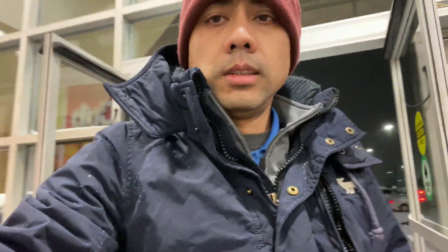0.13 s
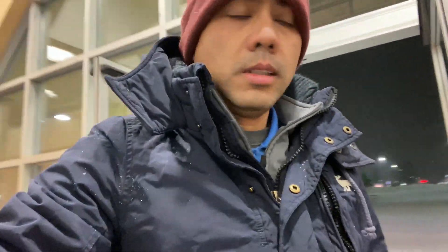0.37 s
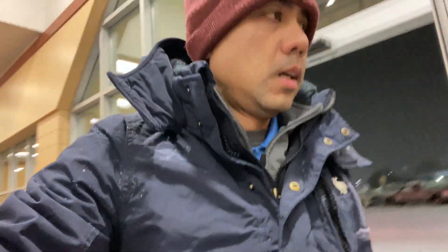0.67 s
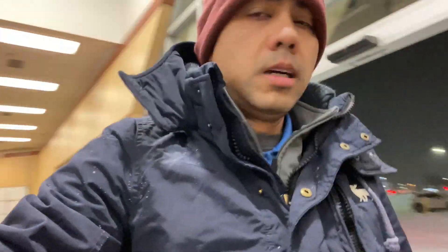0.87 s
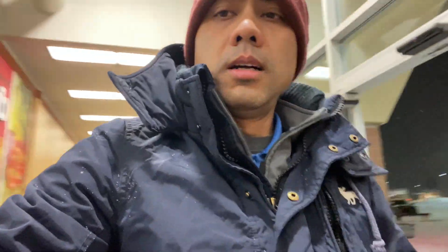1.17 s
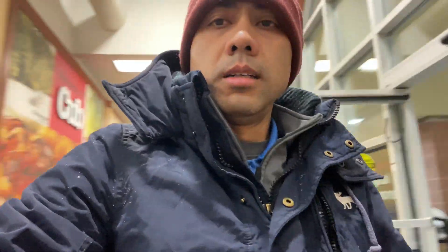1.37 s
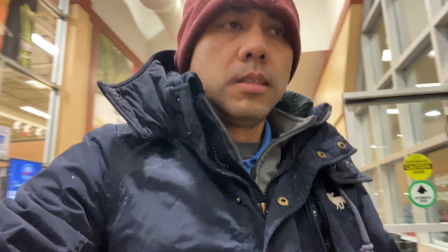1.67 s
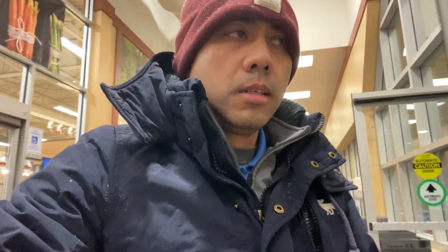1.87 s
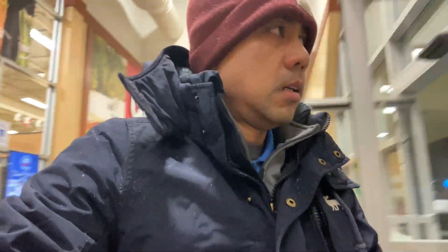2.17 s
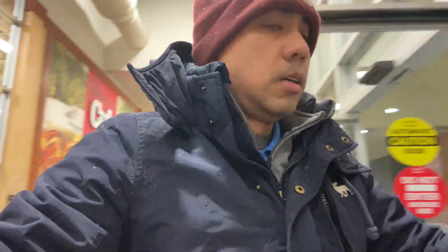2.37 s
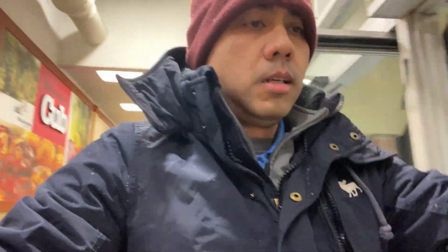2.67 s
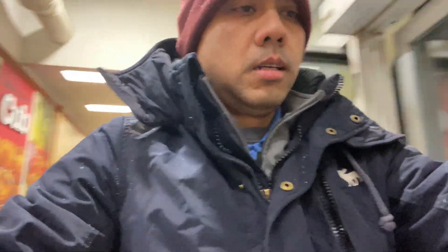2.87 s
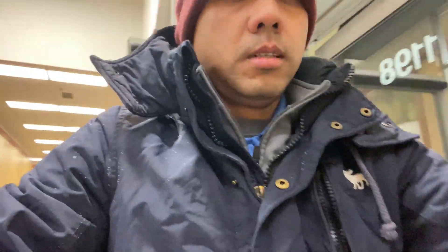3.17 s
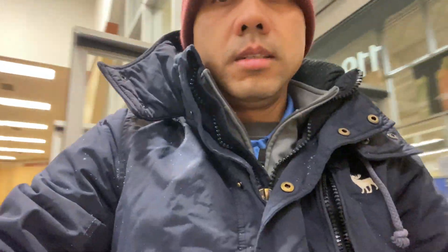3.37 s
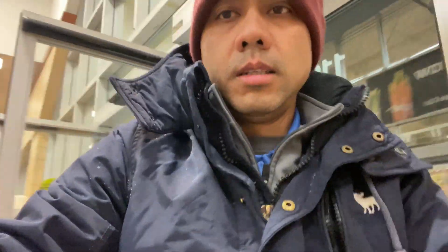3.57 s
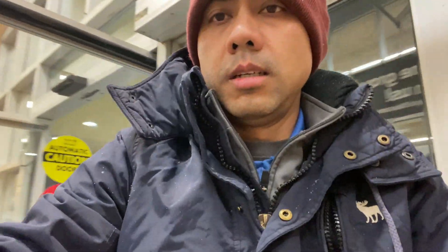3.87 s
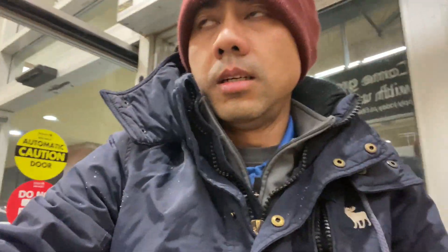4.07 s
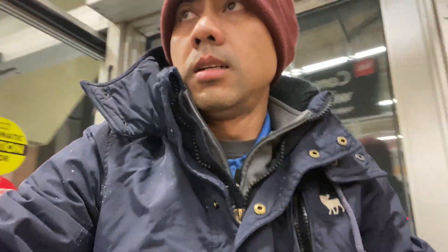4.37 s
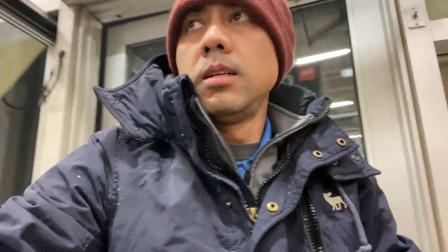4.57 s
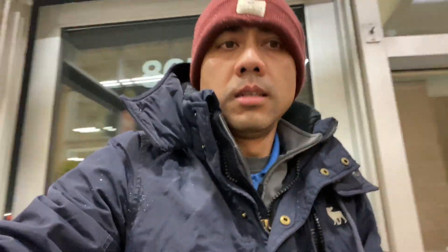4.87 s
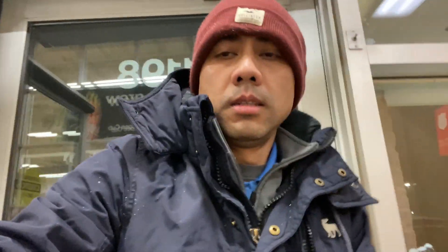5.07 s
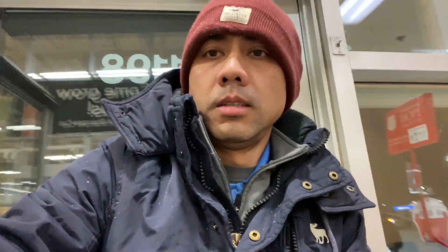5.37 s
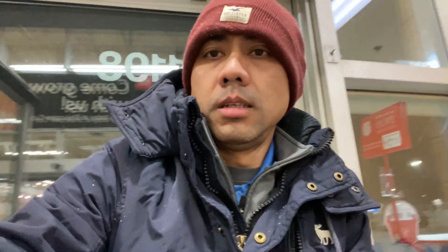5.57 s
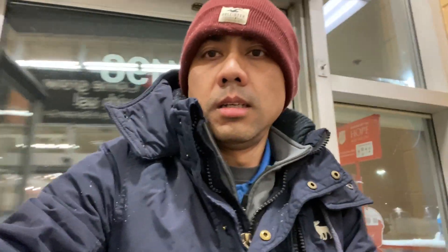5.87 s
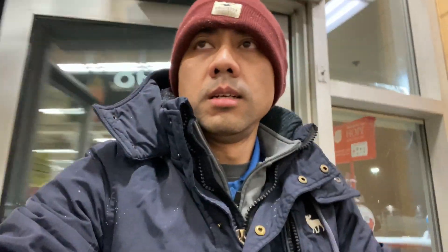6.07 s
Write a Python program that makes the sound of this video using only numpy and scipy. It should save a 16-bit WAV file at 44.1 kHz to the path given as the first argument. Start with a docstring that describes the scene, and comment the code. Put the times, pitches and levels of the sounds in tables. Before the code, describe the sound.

A metal shopping cart rumbles through a store entrance, with one sharp early clack, then thudding door sills and close nylon jacket swishes.

```python
"""Shopping cart through a store entrance

A metal cart is pushed through glass doors, heard from the cart itself.
Grit impacts drive the rumble, the roar and the modes of frame and basket; sills give thuds and knocks.
Loose metal clacks and rattles as bursts of contacts on ringing modes; low hums drone, casters scuff.
A nylon jacket swishes close by as shaped grain noise; a narrow whine comes in runs.
Air hisses, and faint hiss pulses recur steadily, as from an ultrasonic door sensor.
"""
import sys
import numpy as np
from scipy import signal
from scipy.fft import rfft, irfft, next_fast_len
from scipy.io import wavfile

SR = 44100
rng = np.random.default_rng(int(sys.argv[2]) if len(sys.argv) > 2 else 0)


def digitize_waveform(pressure):
    """Quantize a signal to 16-bit integers and store it at the path in sys.argv[1].

    Rows of a 2-D input are taken as channels; values are limited to [-1, 1].
    """
    field = np.atleast_2d(pressure).T
    bounded = np.clip(field, -1, 1)
    quanta = np.round(bounded * 32767).astype(np.int16)
    wavfile.write(sys.argv[1], SR, quanta)


N = 274302
TIME = np.arange(N) / SR

# rolling, by speed and floor: t/s, rumble level before trim/dB, roar level before trim/dB
ROLLING = [(0, -26.5, -33.5), (.7, -25.5, -32.5), (1.27, -29, -30.5), (1.45, -24.5, -32.5), (2.4, -26, -34),
           (3.1, -24, -35), (4.05, -24, -33), (5.3, -23.5, -33.5), (5.7, -23.5, -29.5), (6.22, -25, -33)]
# frame rumble spectrum: f/Hz, relative density/dB per Hz
RUMBLE_SPECTRUM = [(20, -31), (35, -20), (50, -6), (80, -4), (110, -6.5), (150, 2), (200, -2.5),
                   (250, -2.5), (320, -9), (450, -21.5), (900, -50.5)]
# wheel roar spectrum: f/Hz, relative density/dB per Hz
ROAR_SPECTRUM = [(150, -15), (300, -15.5), (420, -1), (530, 3), (700, -2.5), (850, -3.5), (1100, -10.5),
                 (1600, -34), (3000, -33.5), (8000, -43.5)]
# tube frame modes: f/Hz, relative level/dB, t60/s
FRAME_MODES = [(288.6, -0.5, 0.22), (405, -6, 0.3), (487, -8.5, 0.49)]
# wire basket modes, also rung by clacks: f/Hz, relative level/dB, t60/s
BASKET_MODES = [(411, 3.5, 0.081), (558.5, 4, 0.25), (864, -6, 0.16), (1017, -0.5, 0.082), (1220, -3, 0.15),
                (1303, -7, 0.28), (1440, -8.5, 0.15), (1880, -13, 0.22), (2100, -7, .23), (2660, -13, 0.14),
                (2820, -10, 0.17), (3120, -26.5, 0.22), (3570, -28, 0.16), (3950, -7, 0.13),
                (6530, -5, .08)]
# ribbed sills and mats: start/s, length/s, extra rumble before trim/dB, frame judder level/dB
RIBBED_SILLS = [(3.194, 0.45, -29, -32), (4.375, 0.22, -26, -24), (4.62, 0.24, -48, -24.5),
                (4.883, 0.28, -31, -27)]
SILL_RISE_S, SILL_FALL_S = 0.065, 0.065
SHUDDER_RE_BUMP_DB, SHUDDER_FADE_S = -15.5, 0.026
USUAL_ROAR_DB = -33.5
HUM_AT_USUAL_ROAR_DB, HUM_DB_PER_ROAR_DB = -40, 0.62


def wheels(rumble_trim_db=-1, roar_trim_db=2.5, judder_shared=0.18, shudder_rise_s=0.0043):
    """Grit shakes the frame, roars in the hubs and hums the basket; sills judder, bumps shudder."""
    ribs = [(stretch(s, length_s, SILL_RISE_S, SILL_FALL_S), low_db, judder_db)
            for s, length_s, low_db, judder_db in RIBBED_SILLS]
    shudder = together(amp(db + SHUDDER_RE_BUMP_DB) * fading(s, shudder_rise_s, SHUDDER_FADE_S)
                       for s, db, *_ in WHEEL_BUMPS)
    sill_shaking = [on * amp(low_db) for on, low_db, _ in ribs]
    shaking = together([level(ROLLING, axis=1), shudder] + sill_shaking)

    tremor = grains(per_s=2500, spread_db=1) * waver(rate_hz=14, depth_db=.6)
    rumble = unit(colour(tremor, RUMBLE_SPECTRUM, LIKENESS)) * shaking

    grit = grains(per_s=5000, spread_db=1.2) * waver(rate_hz=14, depth_db=.8)
    roar = unit(colour(grit, ROAR_SPECTRUM, LIKENESS)) * level(ROLLING, axis=2)

    frame = shaken(FRAME_MODES)
    frame = unit(frame + judder_shared * frame[::-1])
    judder = frame * together(on * amp(judder_db) for on, _, judder_db in ribs)

    hum = shaken(BASKET_MODES) * amp(HUM_AT_USUAL_ROAR_DB) * pace() ** HUM_DB_PER_ROAR_DB
    return amp(rumble_trim_db) * rumble + amp(roar_trim_db) * roar + judder + hum


def pace():
    """Roar gain relative to the usual roar."""
    return level(ROLLING, axis=2) / amp(USUAL_ROAR_DB)


# wheels on sills and mats: t/s, level before trim/dB, thud f/Hz, knock re thud before trim/dB, left-right/dB
WHEEL_BUMPS = [(3.184, -6, 273, -8.5, -6), (3.195, -19, 275, -2, -4), (3.216, -9, 235, -8, -17),
               (3.2204, 2, 166, -18, -4), (3.281, -2, 139, -11, -1), (3.293, -12.5, 198, -7, -3),
               (3.311, -14, 164, -18, 3), (3.349, -10, 136, -6.5, -2), (3.404, -2.5, 158, -16, -4),
               (3.45, -7, 138, -22, -3), (3.566, -11, 197, -14, 8), (3.611, -18, 236, -0.5, -4),
               (3.632, -19.5, 304, 1, -1), (4.131, -8, 168, -7.5, -4), (4.146, -8.5, 186, -21, 2),
               (4.187, -12.5, 243, 1.5, 3.5), (4.279, -1, 269, -22, -4), (4.357, -3.5, 282, -24, -4),
               (4.476, -11.5, 268, -10, -2), (4.519, -16.5, 149, -3, -5), (4.671, -10, 280, -14, -4),
               (4.714, -23, 274, -12, 3), (4.758, -8.5, 287, -6, -6), (4.859, 1, 274, -12.5, -3.5),
               (4.928, -6, 261, -13, 3), (4.934, -0.5, 156, -15, -4), (4.95, -8, 255, -12, -7),
               (5.268, -13, 172, -10, -4), (5.392, -17, 226, -6, -.5), (5.491, -8.5, 275, -6, -8),
               (5.503, -14, 306, -12, -7), (5.526, -9, 177, -8, 3), (5.623, -10, 282, -5, -4),
               (5.682, -6.5, 171, -12, -2), (5.703, -12, 199, -8.5, -.5)]
# knock spectrum: f/Hz, relative density/dB per Hz
KNOCK_SPECTRUM = [(60, -15), (130, -20), (300, 0.5), (500, -2), (800, -5.5), (1050, -17), (1500, -20),
                  (4000, -48), (16000, -91)]


def bumps(thud_trim_db=-3, knock_trim_db=-2.0, thud_fade_s=0.013, thud_rise_s=0.0068, knock_fade_s=0.01):
    """A wheel drops over an edge: a hard knock and a damped sine thud of the frame."""
    out, t = np.zeros((2, N)), TIME[:SR // 4]
    envelope = np.exp(-t / thud_fade_s) * (1 - np.exp(-t / thud_rise_s))
    for s, db, hz, knock_db, side_db in WHEEL_BUMPS:
        thud = amp(thud_trim_db) * np.sin(2 * np.pi * hz * t) * envelope
        knock = amp(knock_trim_db + knock_db) * burst(KNOCK_SPECTRUM, knock_fade_s)
        add(out, s, amp(db) * pan(side_db) * (thud + knock))
    return out


# hardest wheel strikes on metal sills: t/s, level/dB, first f/Hz
SILL_CLONKS = [(3.183, -16.5, 724), (3.2155, -11.5, 973), (3.61, -22, 792), (4.928, -19.5, 1017),
               (5.49, -21, 800)]


def clonks(fade_s=0.0042, sag_s=0.011):
    """A hollow clonk that sags in pitch as the tread gives."""
    out, t = np.zeros((2, N)), TIME[:SR // 8]
    envelope = 2 * (t / fade_s) ** .5 * np.exp(-t / fade_s)
    for s, db, hz in SILL_CLONKS:
        turns = np.cumsum(hz / (1 + t / sag_s)) / SR
        add(out, s, amp(db) * (envelope * np.sin(2 * np.pi * turns))[None])
    return out


# loose metal blows: t/s, level/dB, fade/s, treble lift/dB, left-right/dB
METAL_CLACKS = [(1.101, -23, 0.013, -2, 7), (1.1112, -4.5, 0.0033, 2, -4.5), (1.1173, -19, 0.0021, 7, -11),
                (1.1233, -21, 0.0067, -4, 6), (1.1357, -9, 0.004, -1, 2.5), (1.1382, -9, 0.0017, 47, -2),
                (1.1406, -13, 0.0068, -4, 3), (1.192, -20, .008, -6, 2), (3.2148, -26, 0.0039, 10, -8),
                (4.186, -18.5, 0.011, -3, -3), (4.565, -24, 0.015, 0, -1), (4.7343, -22, 0.012, -3, -6),
                (4.927, -27, 0.0039, -9, 2), (5.491, -23, 0.0027, -6, 3), (5.4955, -16.5, 0.012, -6, -3)]
# clack spectrum before lift: f/Hz, relative density/dB per Hz
CLACK_SPECTRUM = [(120, -18), (350, -2), (600, 0.5), (900, 4), (1400, 4), (2000, -2), (2900, -0.5),
                  (4200, -7), (6000, -12), (8200, -13.5), (10000, -17.5), (16000, -31)]


def clacks(ring_re_clack_db=15, knee_hz=4000):
    """Loose metal chatters against the basket, and every blow rings its modes."""
    out = np.zeros((2, N))
    for s, db, fade_s, lift_db, side_db in METAL_CLACKS:
        spectrum = [(hz, d + lift_db * hz ** 2 / (hz ** 2 + knee_hz ** 2)) for hz, d in CLACK_SPECTRUM]
        add(out, s, amp(db) * pan(side_db) * burst(spectrum, fade_s))
        add(out, s, amp(db + ring_re_clack_db) * ring(BASKET_MODES))
    return out


# cart body under the heaviest clacks: t/s, level/dB, f/Hz, fade/s
BODY_BOOMS = [(1.11, -15, 420, 0.017), (1.136, -15, 270, 0.005), (1.164, -17, 551, 0.041)]


def booms(rise_s=0.0037):
    """Short low rings of the cart's body under the heavy clacks."""
    out = np.zeros((2, N))
    for s, db, hz, fade_s in BODY_BOOMS:
        out += amp(db) * fading(s, rise_s, fade_s) * np.sin(2 * np.pi * hz * (TIME - s))
    return out


# loose wires: t/s, level/dB, pitch f/Hz, chatter/s, left-right/dB
WIRE_RATTLES = [(1.111, -24, 2600, 0.0061, -8), (1.123, -17, 2620, 0.0033, 13), (1.14, -14, 1450, .003, 0),
                (1.187, -31, 2970, 0.0038, 1), (3.184, -30, 2640, .003, 9), (3.215, -28, 2150, 0.0038, 6),
                (3.29, -30, 2470, 0.0082, 2.5), (3.349, -32, 2000, 0.0046, -2),
                (3.385, -32, 2520, 0.0037, 2.5), (4.565, -26, 1876, 0.012, 2),
                (4.735, -24, 2650, 0.0036, 2), (4.737, -31, 1880, 0.0073, 9),
                (4.749, -29.5, 2890, 0.0047, 0), (4.831, -28, 2970, .003, 2), (4.9267, -27, 2100, .003, 2),
                (4.966, -34, 2500, .003, -1), (5.495, -19, 2010, 0.0054, 0), (5.51, -26, 2060, .005, 2),
                (5.537, -26, 2350, .004, 1), (5.552, -26, 2030, .004, -1), (5.569, -27, 2030, 0.0054, 6)]
# wire modes: multiple of pitch, relative level/dB, t60/s
WIRE_MODES = [(1, 5.5, 0.023), (1.1, -6, .018), (1.3, 1, .016), (1.6, -4, 0.022)]


def rattles():
    """A loose wire chatters against its neighbours and rings briefly at its own pitch."""
    out = np.zeros((2, N))
    for s, db, hz, chatter_s, side_db in WIRE_RATTLES:
        wire = ring([(hz * k, d, t60) for k, d, t60 in WIRE_MODES])[:, :SR // 8]
        x = signal.fftconvolve(contacts(chatter_s), wire, axes=1)
        x *= np.sqrt(chatter_s * SR) / np.linalg.norm(x, axis=1, keepdims=True)
        add(out, s, amp(db) * pan(side_db) * x)
    return out


# low hums of wheels and basket: start/s, length/s, first f/Hz, last f/Hz, level/dB
CART_DRONES = [(0.15, 0.86, 96, 95.1, -37), (0.565, 0.29, 243, 233.4, -30), (1.34, 1.11, 155, 147, -32),
               (.55, 0.87, 558, 559, -49), (1.828, 0.49, 560, 574, -37.5), (2.79, 0.33, 148, 144.8, -35),
               (3.022, 0.2, 220, 255, -27), (3.883, 0.36, 178, 177.5, -31)]
DRONE_FADE_S = 0.073


def drones():
    """Unsteady low hums of wheels and basket, each gliding slightly in pitch."""
    out = np.zeros((2, N))
    for s, length_s, first_hz, last_hz, db in CART_DRONES:
        glide_hz = np.interp(TIME, [s, s + length_s], [first_hz, last_hz])
        drone = tone(glide_hz, drift=0.01337, flutter_db=2.0, port_turns=0.023)
        out += drone * amp(db) * stretch(s, length_s, DRONE_FADE_S, DRONE_FADE_S)
    return out


# casters sideways in turns: start/s, length/s, level/dB
CASTER_SCUFFS = [(.48, 0.32, -43.5), (1.375, 0.25, -41), (3.23, 0.24, -36), (4.707, 0.12, -29),
                 (5.504, 0.38, -38.5), (6.06, .24, -41.5)]
# scuff modes: f/Hz, relative level/dB, t60/s
CASTER_MODES = [(2140, 0, 0.017), (2496, 3, 0.047), (2720, -7, 0.045), (5160, -1, .015)]
SCUFF_RISE_S, SCUFF_FALL_S = 0.02, 0.074


def scuffs(pitch_spread=0.092):
    """Casters stick and slip in turns: clumped tiny ticks at five slightly different pitches."""
    slips = np.zeros((2, N))
    for k in 1 + pitch_spread * np.linspace(-1, 1, 5):
        slips += shaken([(hz * k, db, t60) for hz, db, t60 in CASTER_MODES], per_s=130)
    clumps = waver(rate_hz=60, depth_db=3.5)
    turns = together(amp(db) * stretch(s, length_s, SCUFF_RISE_S, SCUFF_FALL_S)
                     for s, length_s, db in CASTER_SCUFFS)
    return unit(slips * clumps) * turns


# sleeve strokes: t/s, level/dB, rise/s, fade/s
SLEEVE_STROKES = [(3.251, -26, 0.0076, 0.11), (3.368, -29.5, 0.0037, 0.083), (3.94, -30, 0.017, 0.07),
                  (4.078, -24.5, .003, 0.01), (4.093, -14, 0.019, 0.045), (4.147, -12.5, 0.0012, 0.04),
                  (4.34, -31, 0.02, 0.083), (4.44, -21.5, 0.009, 0.12), (4.468, -29, 0.0088, 0.06),
                  (4.54, -25.5, 0.033, 0.12), (4.666, -20, 0.0084, 0.07), (4.77, -27, .015, 0.054),
                  (4.825, -23.5, 0.0099, 0.13), (4.952, -21.5, 0.0019, 0.062), (5.135, -31, 0.006, 0.042),
                  (5.273, -21.5, 0.0031, 0.04), (5.365, -23, 0.005, 0.04), (5.452, -26.5, 0.0042, 0.15),
                  (5.556, -23, 0.0046, 0.035), (5.639, -23, 0.0025, 0.09), (5.779, -23, 0.0048, 0.051),
                  (5.835, -22, 0.0085, 0.023), (6.147, -33.5, 0.0031, 0.019)]
# nylon slip spectrum: f/Hz, relative density/dB per Hz
NYLON_SPECTRUM = [(300, -12), (1200, 2), (2500, 7), (4000, 6), (6000, 7.5), (8300, 8.5), (9800, 7.5),
                  (12000, 3.5), (14000, 6.5), (15600, -43)]
# tick spectrum: f/Hz, relative density/dB per Hz
TICK_SPECTRUM = [(500, -26), (1500, -13), (3000, 0), (5000, -18), (8000, -26), (16000, 2)]
# near-field left-right likeness: f/Hz, correlation before clipping
NEAR_LIKENESS = [(500, 0.43), (2000, -0.73), (3200, 0.18), (5000, 0.093), (6800, -0.18), (8300, 0.1),
                 (9400, -1.41), (11500, .98), (12600, 0.99), (14100, -1.4), (16000, -0.14)]


def jacket(tick_db=-14.0, wet_db=-5, split_hz=5500, lag_s=0.016):
    """Nylon threads slip: hiss, a duller cloth body swelling behind it, sparse bright ticks in the rustle."""
    swish = together(amp(db) * fading(s, rise_s, fade_s) for s, db, rise_s, fade_s in SLEEVE_STROKES)
    r = np.exp(-1 / (lag_s * SR))
    swell = signal.lfilter([1 - r], [1, -r], swish) * waver(rate_hz=55, depth_db=1.5)
    slips = unit(colour(grains(per_s=17000, spread_db=0.0), NYLON_SPECTRUM, NEAR_LIKENESS))
    ticks = unit(colour(grains(per_s=450, spread_db=2.5), TICK_SPECTRUM, NEAR_LIKENESS))
    friction = slips + amp(tick_db) * ticks
    low_pass = signal.butter(2, split_hz, fs=SR, output="sos")
    body = signal.sosfiltfilt(low_pass, friction)
    hiss = friction - body
    cloth = body * swell + hiss * swish
    return cloth + amp(wet_db) * hall(cloth, build_s=0.03, dull_hz=3500)


# narrow whine, likely automatic door motors: start/s, length/s, level/dB
WHINE_RUNS = [(-.1, 0.56, -41.5), (0.446, 0.57, -35), (1.095, 0.62, -35.5), (3.897, 0.63, -39),
              (4.595, 0.84, -40.5), (5.505, 0.66, -37)]
WHINE_HZ, WHINE_FADE_S = 681, 0.05


def whine():
    """A wandering narrow tone that swells and dies with each run."""
    runs = together(amp(db) * stretch(s, length_s, WHINE_FADE_S, WHINE_FADE_S)
                    for s, length_s, db in WHINE_RUNS)
    return tone(WHINE_HZ, drift=0.00412, flutter_db=3.0, port_turns=0.088) * runs


# pulse hiss spectrum: f/Hz, relative density/dB per Hz
SENSOR_SPECTRUM = [(500, -27), (2000, -36), (5000, -6), (10000, 1.5), (16000, -5)]
SENSOR_START_S, SENSOR_PERIOD_S = .311, .6945


def sensor(hiss_db=-40, length_s=0.059):
    """Evenly spaced half-sine pulses of hiss, nearly alike left and right."""
    phase = (TIME - SENSOR_START_S) % SENSOR_PERIOD_S / length_s
    swell = np.sin(np.pi * np.minimum(phase, 1))
    noise = rng.standard_normal((2, N))
    hiss = unit(colour(noise, SENSOR_SPECTRUM, [(100, 0.99), (16000, 1.0)]))
    return amp(hiss_db) * swell * hiss


# entrance air spectrum: f/Hz, relative density/dB per Hz
AIR_SPECTRUM = [(300, -21.5), (1000, 5), (1700, 6), (2600, 4), (3500, -0.5), (5000, -3), (7000, -3.5),
                (8300, -4.5), (10000, -10.5), (16000, -29)]
# entrance air: t/s, level before waver/dB
AIR_LEVEL = [(0, -37.5), (.7, -35.5), (1.5, -36.5), (2.2, -37.5), (3.7, -36), (5, -36), (6.2, -36.5)]


def air():
    """Hiss of the entrance and its ventilation: coloured noise, wavering in level."""
    hiss = unit(colour(rng.standard_normal((2, N)), AIR_SPECTRUM, LIKENESS))
    return hiss * level(AIR_LEVEL) * waver(rate_hz=25, depth_db=1.26)


# entrance reverberation: f/Hz, t60/s
HALL_T60 = [(150, 0.31), (600, 0.58), (2000, 0.55), (3500, 0.45), (5500, 0.58), (12000, 0.3)]


def hall(x, build_s=0.0053, dull_hz=7000):
    """Dense reflections from glass and tile: noise decaying by band, with weakened treble."""
    hz, t, z = signal.stft(rng.standard_normal((2, SR)), SR, nperseg=256)
    decay = amp(-60 * t / read(HALL_T60, hz)[:, None])
    tail = signal.istft(z * decay, SR, nperseg=256)[1]
    tail *= 1 - np.exp(-TIME[:tail.shape[1]] / build_s)
    r = np.exp(-2 * np.pi * dull_hz / SR)
    tail = signal.lfilter([1 - r], [1, -r], tail / np.linalg.norm(tail[0]))
    return signal.fftconvolve(x, tail, axes=1)[:, :N]


def ring(modes, port_gap_s=0.00021):
    """Decaying sines of a set of modes, reaching the right a little after the left."""
    t = np.maximum(TIME[:SR] - np.array([[0], [port_gap_s]]), 0)
    x = sum(amp(db - 60 * t / t60) * np.sin(2 * np.pi * hz * t) for hz, db, t60 in modes)
    return x / np.linalg.norm(x[0])


def shaken(modes, per_s=2500):
    """A body kept ringing by a train of tiny impacts."""
    impacts = grains(per_s, spread_db=3.2)
    return unit(signal.fftconvolve(impacts, ring(modes), axes=1)[:, :N])


def grains(per_s, spread_db):
    """Left and right impacts of uneven size at random times."""
    size = amp(spread_db * np.minimum(rng.exponential(1, N), 4))
    hits = rng.random(N) < per_s / SR
    return unit(rng.standard_normal((2, N)) * size * hits)


def contacts(fade_s, per_s=4500, spread_db=1.4, first_db=7):
    """One solid blow, then a short flurry of uneven bounces."""
    t = TIME[:SR // 4]
    size = amp(spread_db * np.minimum(rng.exponential(1, len(t)), 3))
    size *= rng.random(len(t)) < per_s / SR
    size[0] = amp(first_db)
    signs = rng.choice([-1., 1.], (2, len(t)))
    return signs * size * np.exp(-(t / fade_s) ** 2 / 2)


def burst(spectrum, fade_s):
    """A blow and its bounces, in the colour of the thing struck."""
    x = colour(contacts(fade_s), spectrum, LIKENESS)
    return x / np.sqrt(np.sum(x ** 2) / (fade_s * SR))


def tone(hz, drift, flutter_db, port_turns):
    """A narrow tone wandering in pitch and level, out of step left to right."""
    knots = rng.standard_normal(256)
    wander = drift * np.interp(TIME * 25, np.arange(len(knots)), knots)
    turns = np.cumsum(hz * (1 + wander)) / SR
    flutter = waver(rate_hz=30, depth_db=flutter_db)
    return unit(np.sin(2 * np.pi * (turns + np.array([[0], [port_turns]]))) * flutter)


# all-round left-right likeness: f/Hz, correlation before clipping
LIKENESS = [(50, 0.77), (130, 0.93), (220, 0.77), (380, 0.33), (680, 0.05), (1400, -0.4), (1900, -0.4),
            (2700, 0.084), (8000, 0.029), (8800, -0.73), (9900, -2.67), (11500, .98), (14600, -1.5)]
# channel balance: f/Hz, left-right/dB
BALANCE = [(60, -1), (200, -0.1), (450, -2), (800, -0.5), (1300, 2), (2500, 4), (8000, 3.5), (13000, -1)]


def colour(pair, spectrum, likeness):
    """Gives two signals a minimum-phase colour, left-right correlation and balance."""
    size = next_fast_len(pair.shape[1] + 2048)
    size += size % 2
    hz = np.fft.rfftfreq(size, 1 / SR)
    a, b = rfft(pair, size)
    same = np.clip(read(likeness, hz), -.98, .98)
    mid, side = a * np.sqrt(1 + same), b * np.sqrt(1 - same)
    # folded cepstrum: causal filter
    cepstrum = irfft(np.log(amp(read(spectrum, hz))))[:size // 2]
    cepstrum[1:] *= 2
    lean = amp(read(BALANCE, hz) / 2)
    ports = np.array([(mid + side) * lean, (mid - side) / lean])
    return irfft(ports * np.exp(rfft(cepstrum, size)))[:, :pair.shape[1]]


def waver(rate_hz, depth_db):
    """A gain that wanders at random."""
    knots = rng.standard_normal(4096)
    return amp(depth_db * np.interp(TIME * rate_hz, np.arange(len(knots)), knots))


def stretch(start_s, length_s, rise_s, fall_s):
    """An envelope that rises, holds and falls."""
    t = TIME - start_s
    return np.clip(np.minimum(t / rise_s, (length_s - t) / fall_s), 0, 1)


def fading(start_s, rise_s, fade_s):
    """An envelope that rises and dies away exponentially."""
    t = np.maximum(TIME - start_s, 0)
    return (1 - np.exp(-t / rise_s)) * np.exp(-t / fade_s)


def together(gains):
    """Joint gain of unrelated causes: powers add."""
    return np.sqrt(sum(gain ** 2 for gain in gains))


def level(rows, axis=1):
    """One dB column of a curve as a gain for every sample."""
    rows = np.asarray(rows)
    return amp(np.interp(TIME, rows[:, 0], rows[:, axis]))


def read(points, hz):
    """Reads a table along a logarithmic frequency axis."""
    f, value = np.transpose(points)
    return np.interp(np.log(hz + 1), np.log(f + 1), value)


def amp(db):
    """Decibels to gain."""
    return 10 ** (np.asarray(db) / 20)


def unit(x):
    """Scales to an rms of 1."""
    return x / np.sqrt(np.mean(x ** 2) + 1e-20)


def pan(db):
    """Left and right gains for a level difference."""
    return amp([[db / 2], [-db / 2]])


def add(mix, s, sound):
    """Mixes a sound in at a time."""
    part = mix[:, max(round(s * SR), 0):][:, :sound.shape[1]]
    part += sound[:, :part.shape[1]]


def scene(bump_wet_db=-9, clack_wet_db=-5.0, rattle_wet_db=-8):
    """The cart and the jacket in the entrance hall."""
    low, sharp, wires = bumps() + clonks() + booms(), clacks(), rattles()
    echo = hall(amp(bump_wet_db) * low + amp(clack_wet_db) * sharp + amp(rattle_wet_db) * wires)
    cart = wheels() + low + sharp + wires + echo + drones() + scuffs()
    return cart + jacket() + whine() + sensor() + air()


def record(dry, ceiling=.95, edge_hz=15900):
    """Clips peaks at the ceiling, then low-passes."""
    limited = np.clip(dry, -ceiling, ceiling)
    low_pass = signal.firwin(401, edge_hz, window=("kaiser", 9), fs=SR)
    return signal.oaconvolve(limited, low_pass[None], "same")


dry = scene()
out = record(dry)
digitize_waveform(out)
```